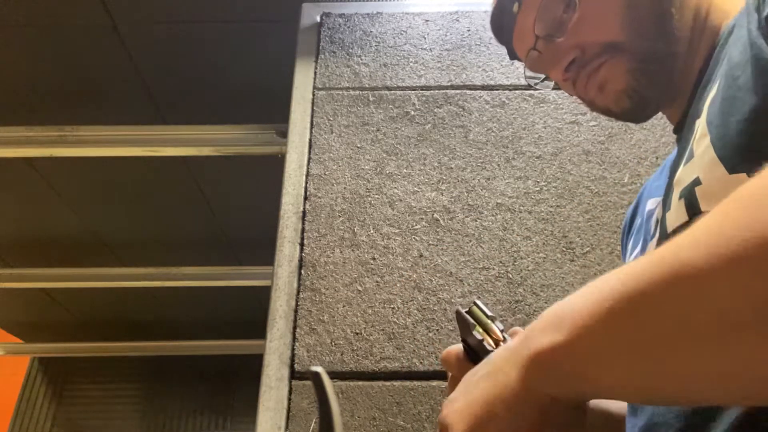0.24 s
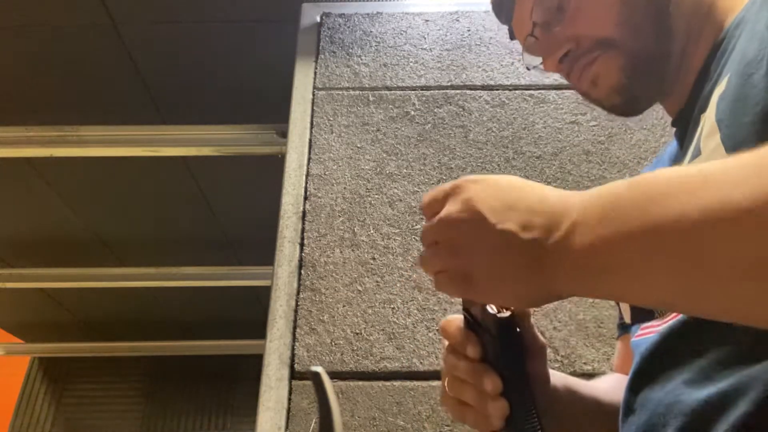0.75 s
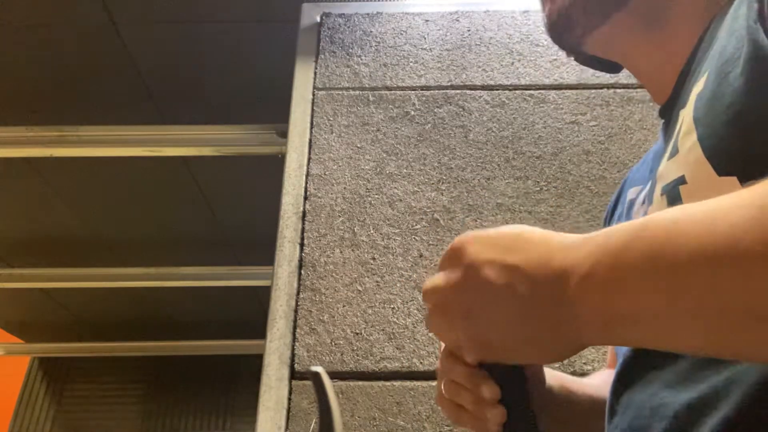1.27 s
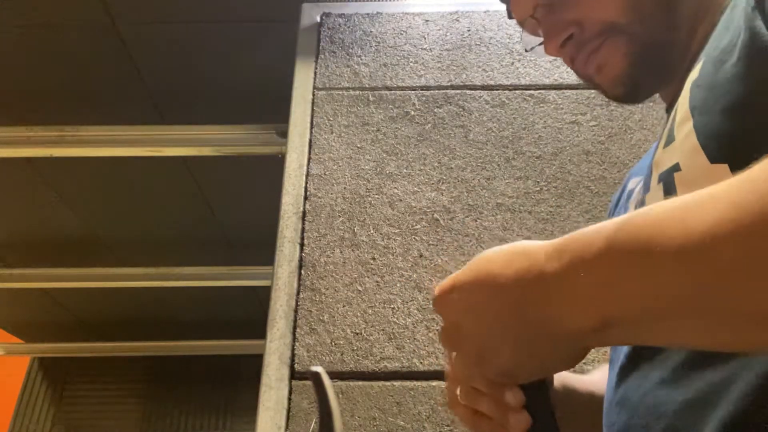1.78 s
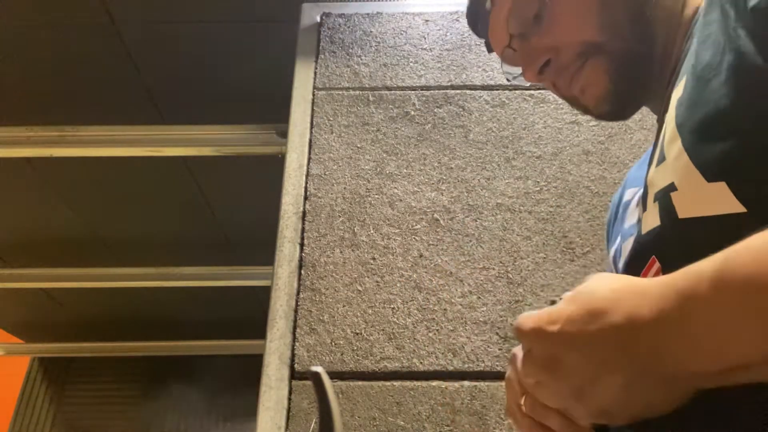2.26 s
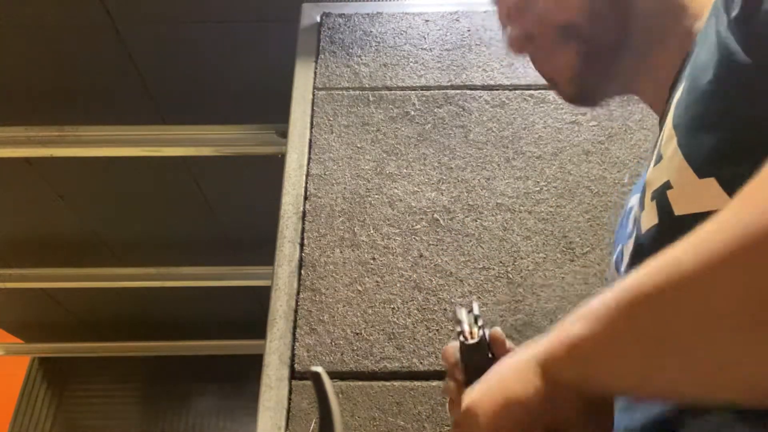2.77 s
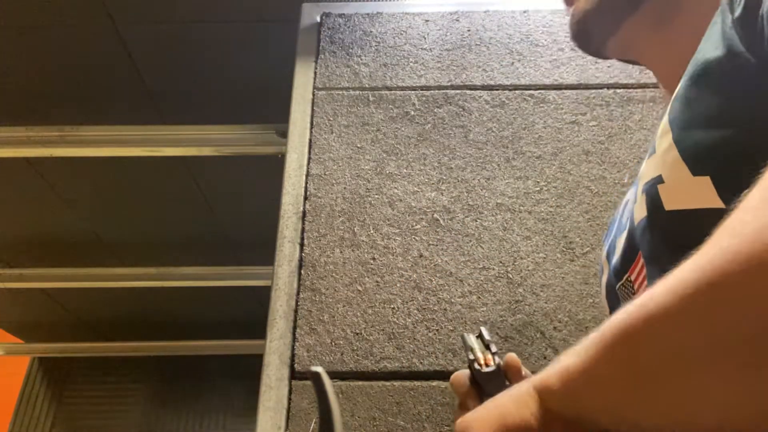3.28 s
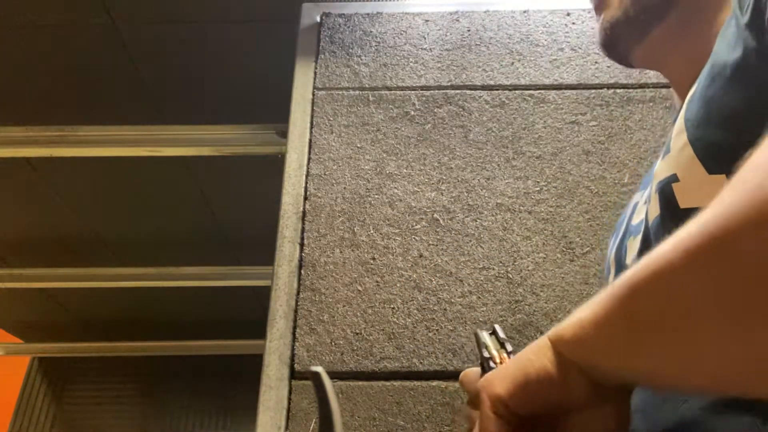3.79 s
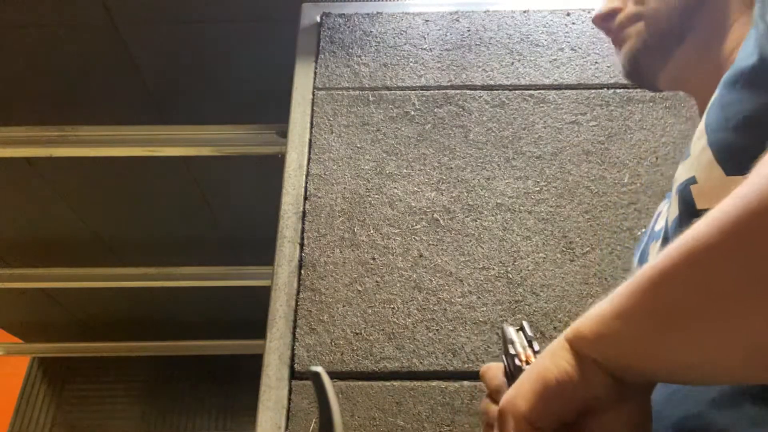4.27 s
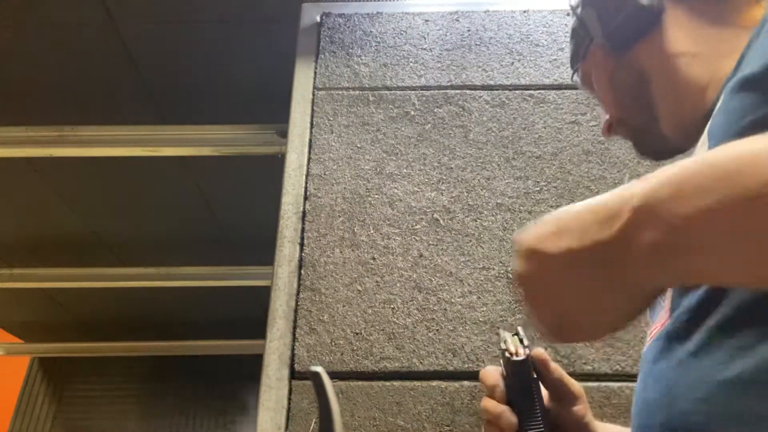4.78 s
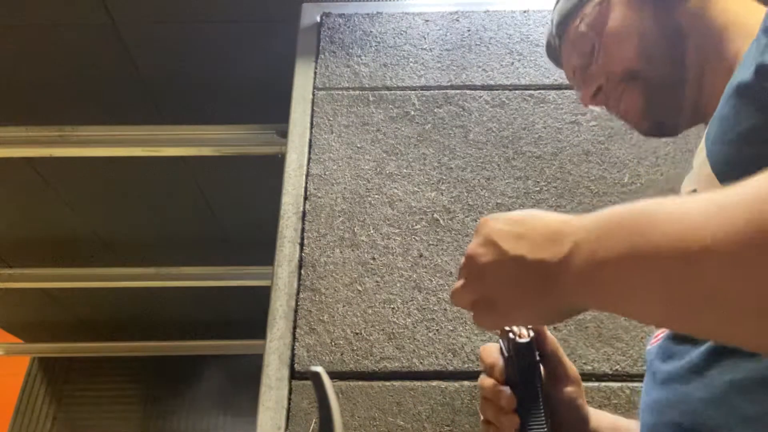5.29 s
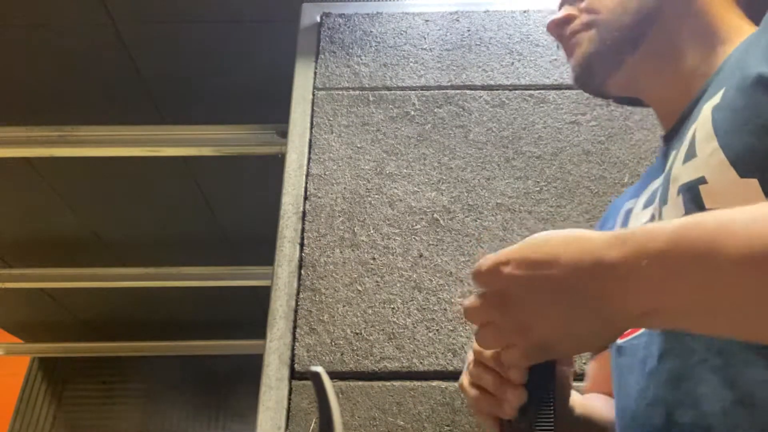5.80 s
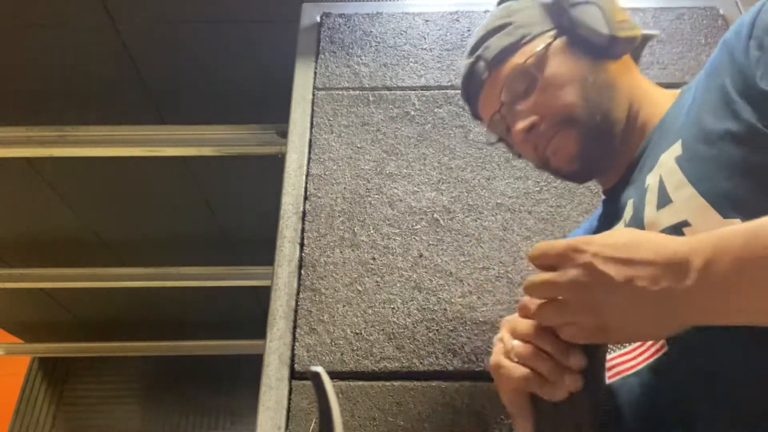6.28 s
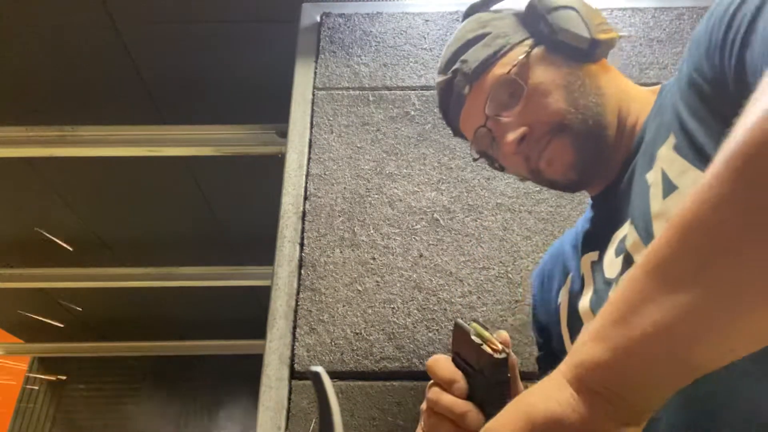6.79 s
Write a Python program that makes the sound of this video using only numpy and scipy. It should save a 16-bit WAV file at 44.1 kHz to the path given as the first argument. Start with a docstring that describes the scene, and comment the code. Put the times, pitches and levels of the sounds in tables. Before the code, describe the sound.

Handheld-style stereo pickup in a range booth: very loud blasts from other lanes, unevenly spaced, each rolling down the hall and surging back from the backstop. Near shots are sharp and fluttering; far ones dull and roaring. In the gaps come tiny close brass clinks, sliding scrapes and clicks of a magazine being loaded, above steady airy fan rumble. The last shot is cut off while still ringing.

```python
"""Indoar range: two guns fire in other lanes while someone at the microphone loads a magazine.
Near gun: a volley of shock fronts, then filtered noise as ceiling slap, close reflections and hall.
Far gun: a dull front, then a roar that swells as its reflections come round the partitions.
Each report rolls down the hall and surges back from the backstop. Cartridges are short resonant
noise touches; the ventilation is coloured noise with wavering fan tones."""
import sys
import numpy as np
from scipy import signal
from scipy.fft import rfft, irfft
from scipy.io import wavfile
from scipy.ndimage import uniform_filter1d

SR = 44100
rng = np.random.default_rng(int(sys.argv[2]) if len(sys.argv) > 2 else 0)


def generate_wav(sig):
    """Save sig (samples, or channels by samples) to the path in sys.argv[1] as 16-bit PCM at SR."""
    pcm = np.round(np.clip(np.atleast_2d(sig).T, -1, 1) * 32767).astype(np.int16)
    wavfile.write(sys.argv[1], SR, pcm)


N = 310905
RING = 2 ** 16  # samples computed per report or touch
AGE_S = np.arange(RING) / SR
HZ = np.fft.rfftfreq(RING, 1 / SR)

# Shots of each gun; a negative time is already dying away at the start: (time [s], level [dB])
NEAR_SHOTS = [(-.285, 1.5), (2.0608, -0.53), (4.3204, -0.5), (6.7556, -0.8)]
FAR_SHOTS = [(2.3555, -0.38), (5.1605, -1.63)]
# Relative spectra of first wave and close reflections: (frequency [Hz], density [dB per Hz])
NEAR_FRONT_SPECTRUM = [(50, -18), (150, -15.5), (300, -3), (520, 1), (950, 2.5), (1600, -17), (3000, -38.5),
                       (7000, -43), (12000, -38.5), (15500, -42)]
NEAR_ROAR_SPECTRUM = [(25, -16.5), (50, -12.5), (100, -11.5), (185, -15), (360, -6), (700, 1.5), (1020, -3),
                      (1600, -7.5), (2700, -18.5), (3400, -23.5), (5200, -29), (7500, -33.5), (12000, -38),
                      (15500, -43)]
FAR_FRONT_SPECTRUM = [(50, -14.5), (300, -3.5), (600, 2), (850, 1), (1500, -11), (2600, -22), (4500, -27.5),
                      (7500, -31), (12000, -36), (15500, -41)]
FAR_ROAR_SPECTRUM = [(25, -27.5), (50, -13.5), (110, -6), (175, -5), (255, 0), (360, -8.5), (560, 0),
                     (930, 2.5), (1500, -8), (2650, -17), (3400, -24), (5200, -29), (7500, -30),
                     (12000, -36.5), (15500, -41)]
# Relative spectra of ceiling slap and long hall: (frequency [Hz], density [dB per Hz])
SLAP_SPECTRUM = [(300, -18), (1500, .5), (3500, 1), (5000, -4), (7500, -4.5), (15000, -16.5)]
HALL_SPECTRUM = [(25, -17.5), (50, -6), (120, -0.5), (250, -3.5), (350, -1.5), (600, 0.5), (980, -4),
                 (1450, -14.5), (2700, -19), (3300, -27), (5200, -29.5), (7500, -35), (12000, -46.5),
                 (15500, -58)]
# Decay of close reflections and of the hall: (frequency [Hz], t60 [s])
ROAR_T60 = [(80, 0.1), (250, 0.28), (700, 0.305), (2000, 0.28), (5000, 0.31), (13000, 0.3)]
HALL_T60 = [(60, 1.55), (130, 1), (300, 1.003), (620, 0.87), (930, 1.078), (1400, 1.11), (2600, 0.97),
            (3600, 0.9), (6000, 0.82), (13000, 0.79)]
# Standing waves of the booth: (frequency [Hz], width [Hz], lift [dB])
BOOTH_MODES = [(90, 20, 3), (213, 18, 7), (287, 18, 7), (404, 18, 7), (545, 22, 4), (622, 24, 6),
               (693, 18, 5), (814, 22, 6), (933, 18, 5), (996, 22, 7), (1085, 20, 3), (1189, 22, 4),
               (1293, 36, 4), (1359, 18, 4), (2221, 22, 5), (2561, 26, 5)]
# Strong single reflections off ceiling and walls: (time after shot [s], level [dB])
NEAR_ECHOES = [(.0145, 8.5), (.0158, 7.5), (.0312, 9), (.036, 9), (.046, 6), (.069, 3)]
FAR_ECHOES = [(.022, 14.5), (.0305, 8), (.0405, 12), (.046, 11), (.063, 7.6)]
# Muzzle gas thump: (level [dB], frequency [Hz], peak [s], width [s])
NEAR_THUMP = (-12, 95.6, .019, .008)
FAR_THUMP = (-23.5, 117, .029, .012)
# Bright slap off the ceiling: (level [dB], rise [s], holds until [s], fade [s])
NEAR_SLAP = (-25.3, .016, .018, .02)
FAR_SLAP = (-32, .03, .04, .02)
# Hall, then its surge from the backstop:
# (level [dB], rise [s], surge delay [s], surge level [dB], surge rise [s], surge fade [s])
NEAR_HALL = (-21.8, .011, .23, 3.5, .011, .06)
FAR_HALL = (-20.5, .094, .1964, -1.5, .027, .055)
# Cartridge snaps past the feed lips: (time [s], level [dB], brightness [dB per octave])
SNAPS = [(0.9056, -59, 0.5), (1.0575, -65.5, -3), (2.3322, -48, 8), (2.941, -60, -2), (2.9674, -56.5, 1),
         (3.332, -64, 2), (3.901, -67, 1), (5.5315, -59, 3), (6.145, -58.5, -1), (6.1694, -47, .5)]
# Cartridges pushed along the one below, plus dull rustles of the hand at 3.5 and 3.835 s: (time [s], level
# [dB], brightness [dB per octave], t60 [s])
SLIDES = [(.8, -82, 4, .25), (2.999, -68, .5, 0.32), (3.27, -76, 3, .15), (3.5, -66, -8, .2),
          (3.835, -68, -7, .2), (6.071, -49.5, -1, 0.12), (6.669, -62, -8, 0.16)]
# Loose cases touch in the hand: (time [s], ring level [dB])
CLINKS = [(1.0575, -79), (3.471, -80), (3.653, -81), (3.822, -81), (3.876, -69), (4.1805, -78),
          (6.718, -72)]
# Relative spectrum of the magazine rattle: (frequency [Hz], density [dB per Hz])
MAGAZINE_SPECTRUM = [(600, -9), (1200, 6), (1900, -2.5), (3200, -12), (4800, -8.5), (6800, -15),
                     (8500, -14), (10300, -14.5), (12200, -17.5), (15500, -23)]
# Resonances of the magazine body: (frequency [Hz], width [Hz], lift [dB])
MAGAZINE_MODES = [(1290, 80, 3), (2660, 120, 3), (3670, 120, 4), (4700, 150, 2), (5600, 300, 5)]
# Relative spectrum of moving air: (frequency [Hz], density [dB per Hz])
AIR_SPECTRUM = [(20, -26), (35, -12.5), (55, 4.5), (90, -3.5), (150, -3.5), (230, -9.5), (330, -12.5),
                (900, -15), (1500, -24), (2800, -32), (4500, -39.5), (7000, -48.5), (11000, -53),
                (15500, -57.5)]
# Fan tones: (frequency [Hz], level before the common trim [dB])
FAN_TONES = [(59.2, -69), (134.6, -70), (231.5, -75), (3580, -88.5)]
# Path from each source to the two microphone ports:
# (frequency [Hz], likeness [0-1], phase lead of left [rad], left minus right [dB])
FROM_LANES = [(60, .8, .05, 1.3), (220, .8, .15, -.6), (400, .65, .6, 3.0), (750, .45, 2.0, 2.8),
              (1200, .4, 2.9, -1.8), (1900, .45, 4.0, -1.7), (2700, .35, 6.7, -1.5), (4800, .25, 6.3, -.8)]
FROM_HALL = [(60, .93, -0.5, -1.3), (229.7, .8, 0.0, -0.84), (464, 0.48, 1, 2.5), (836, 0.057, 3, 4),
             (1229.5, 0.61, 4, -2.5), (2350, 0.2, 4.5, -3), (4846, 0.19, 7, -2.5)]
FROM_HANDS = [(94, 0.54, 0.0, -9), (1100, 0.3, -0.74, -4), (2545, 0.69, -.4, -2.5), (4800, 0.43, 0.68, 1.5)]
FROM_VENTS = [(60, .85, 0.0, -.5), (230, .75, -.1, -.8), (420, .45, -1.2, 1.0), (900, .45, -2.4, -2.0),
              (1900, .55, -3.1, -7.0), (3300, .4, -6.0, -4.5), (4800, .25, -6.3, -2.0)]
# Shared path from any direction at the top, where the ports are much alike:
# (frequency [Hz], likeness [0-1], phase lead of left [rad], left minus right [dB])
TOP_OCTAVE = [(6300, .7, .3, 0), (7500, .8, 0, 0), (8900, .85, -1.4, 0), (9750, 1, -np.pi, 0),
              (10750, 1, -np.pi, 0), (11700, .95, -6.1, 0), (13600, .98, -6.3, 0), (15400, .9, -9.2, 0)]

LANE_CHANGE = .5  # new reflections per shot, relative to the lane's fixed pattern
BOUNCE_FIRST_S, BOUNCE_FIRST_GAP_S = .0007, .0023
BOUNCE_CROWDING = .8  # each gap relative to the one before
BOUNCE_DB, BOUNCE_ARCH_DB = 12, 3.6
NEAR_WALL_DB, NEAR_WALL_RISE_S = -15.5, .0014
FAR_WALL_DB, FAR_WALL_START_S, FAR_WALL_RISE_S = -5.5, .016, .028
FAR_FRONT_DB, FAR_FRONT_RISE_S, FAR_FRONT_HOLD_S, FAR_FRONT_FADE_S = -18, .0031, .02, .0027
FAR_ROAR_DB, FAR_ROAR_START_S, FAR_ROAR_RISE_S = .3, .008, .04
PORT_LAG_S, THUMP_LAG_S = .00034, .001  # right port after left: wave fronts, slow push
PORT_LEAN_DB = 1.8  # left minus right, wave fronts
SNAP_RISE_S, SNAP_T60_S = .0018, .052
SNAP_RING_DB, SLIDE_RING_DB = -18.5, -30  # brass ring relative to body
SLIDE_RISE = .07  # pressure build-up relative to t60
CLINK_RISE_S, CLINK_T60_S = .002, .079
CLINK_TICK_DB = 0  # body tick relative to ring
BRASS_HZ, BRASS_WIDTH_HZ = 11900, 260
AIR_DB, FAN_TRIM_DB = -61, -3
RUMBLE_CUT_HZ, EDGE_HZ = 30, 15700


def gun(shots, report):
    """A gun stays in its lane, so its shots share a reflection pattern that changes only in part."""
    out = np.zeros((2, N))
    lane = scatter()
    fade = 1 - swell(1.2, .25)
    for time_s, db in shots:
        spray = (lane + LANE_CHANGE * scatter()) / np.hypot(1, LANE_CHANGE)
        add(out, time_s, amp(db) * fade * report(spray))
    return out


def near_report(spray):
    """Shock fronts, bright ceiling slap, roar of close reflections, hall and gas thump."""
    close = ports(spray, FROM_LANES)
    near_wall = amp(NEAR_WALL_DB) * swell(0, NEAR_WALL_RISE_S)
    far_wall = amp(FAR_WALL_DB) * swell(FAR_WALL_START_S, FAR_WALL_RISE_S)
    wash = absorb(close, ROAR_T60) * (near_wall + far_wall)
    roar_db = read(NEAR_ROAR_SPECTRUM, HZ) + lift_db(BOOTH_MODES)
    roar = colour(wash + arrivals(NEAR_ECHOES), roar_db)
    return flutter() + slap(close, *NEAR_SLAP) + roar + hall(spray, *NEAR_HALL) + thump(*NEAR_THUMP)


def far_report(spray):
    """A weak, dull front bends round the partitions; the main roar follows off ceiling and walls."""
    close = ports(spray, FROM_LANES)
    pulse = close * burst(FAR_FRONT_RISE_S, FAR_FRONT_HOLD_S, FAR_FRONT_FADE_S)
    front = amp(FAR_FRONT_DB) * colour(pulse, read(FAR_FRONT_SPECTRUM, HZ))
    build_up = amp(FAR_ROAR_DB) * swell(FAR_ROAR_START_S, FAR_ROAR_RISE_S)
    wash = absorb(close, ROAR_T60) * build_up
    roar_db = read(FAR_ROAR_SPECTRUM, HZ) + lift_db(BOOTH_MODES)
    roar = colour(wash + arrivals(FAR_ECHOES), roar_db)
    return front + slap(close, *FAR_SLAP) + roar + hall(spray, *FAR_HALL) + thump(*FAR_THUMP)


def flutter(count=4):
    """The shock front bounces between booth partitions at shrinking gaps, levels in one arch."""
    k = np.arange(count)
    gaps_s = BOUNCE_FIRST_GAP_S * BOUNCE_CROWDING ** k
    times_s = BOUNCE_FIRST_S + np.cumsum(gaps_s) - gaps_s
    levels_db = BOUNCE_DB + BOUNCE_ARCH_DB * np.sin(np.pi * (k + .5) / count)
    return colour(arrivals(zip(times_s, levels_db)), read(NEAR_FRONT_SPECTRUM, HZ))


def thump(db, hz, peak_s, width_s):
    """Expanding muzzle gas pushes a few slow cycles through the booth: a cosine in a Gaussian."""
    t = AGE_S - peak_s + THUMP_LAG_S * np.array([[.5], [-.5]])
    return amp(db) * np.cos(2 * np.pi * hz * t) * np.exp(-(t / width_s) ** 2) * swell(0, .006)


def slap(close, db, rise_s, hold_s, fade_s):
    """The hard ceiling throws the treble of the blast down into the booth."""
    return amp(db) * colour(close * burst(rise_s, hold_s, fade_s), read(SLAP_SPECTRUM, HZ))


def hall(spray, db, rise_s, surge_s, surge_db, surge_rise_s, surge_fade_s):
    """Long reverberation, surging again when the blast returns from the backstop."""
    surge_fade = np.exp(-np.maximum(AGE_S - surge_s, 0) / surge_fade_s)
    surge = amp(surge_db) * swell(surge_s, surge_rise_s) * surge_fade
    tail = absorb(ports(spray, FROM_HALL), HALL_T60) * swell(0, rise_s) * (1 + surge)
    return amp(db) * colour(tail, read(HALL_SPECTRUM, HZ) + .5 * lift_db(BOOTH_MODES))


def magazine():
    """Cartridges clink in the hand, slide into the magazine and snap past the feed lips."""
    out = np.zeros((2, N))
    for time_s, db, bright_db in SNAPS:
        add(out, time_s, touch(db, db + SNAP_RING_DB, bright_db, SNAP_RISE_S, SNAP_T60_S))
    for time_s, db, bright_db, t60_s in SLIDES:
        add(out, time_s, touch(db, db + SLIDE_RING_DB, bright_db, SLIDE_RISE * t60_s, t60_s))
    for time_s, db in CLINKS:
        add(out, time_s, touch(db + CLINK_TICK_DB, db, 0, CLINK_RISE_S, CLINK_T60_S))
    return out


def touch(body_db, ring_db, bright_db, rise_s, t60_s):
    """One cartridge contact: noise pressure rattles the magazine body and rings the brass."""
    brass_db = -20 * np.log10(1 + ((HZ - BRASS_HZ) / BRASS_WIDTH_HZ) ** 2)
    octaves = np.log2(np.maximum(HZ, MAGAZINE_SPECTRUM[0][0]) / BRASS_HZ)
    pressure = swell(0, rise_s) * amp(-60 * np.maximum(AGE_S - rise_s, 0) / t60_s)
    contact = ports(rng.standard_normal((2, RING)), FROM_HANDS) * pressure
    body_curve_db = read(MAGAZINE_SPECTRUM, HZ) + lift_db(MAGAZINE_MODES) + bright_db * octaves
    return amp(body_db) * colour(contact, body_curve_db) + amp(ring_db) * colour(contact, brass_db)


def ventilation(waver=.97, flicker=.7):
    """Rumble of moving air, plus fan tones with random-walk phase and slowly varying strength."""
    hz, t = np.fft.rfftfreq(N, 1 / SR), np.arange(N) / SR
    air = unit(irfft(rfft(rng.standard_normal((2, N))) * amp(read(AIR_SPECTRUM, hz)), N))
    drift = np.cumsum(rng.standard_normal((len(FAN_TONES), N)), axis=1) / np.sqrt(SR)
    slow_noise = irfft(rfft(rng.standard_normal((len(FAN_TONES), N))) * np.exp(-(hz / 3) ** 2), N)
    strength = 1 + flicker * unit(slow_noise)
    tones = np.zeros(N)
    for (tone_hz, db), walk, gain in zip(FAN_TONES, drift, strength):
        tones += amp(db) * gain * np.sin(2 * np.pi * (tone_hz * t + waver * walk))
    return amp(AIR_DB) * ports(air, FROM_VENTS) + amp(FAN_TRIM_DB) * tones


def scatter(clump_db=.5):
    """Two sprays of dense reflections, evened out over time and band, arriving in clumps."""
    x = rng.standard_normal((2, RING))
    for size in (2 ** 10, 2 ** 12):
        z = signal.stft(x, nperseg=size)[2]
        x = signal.istft(z / np.sqrt(abs(z) + 1e-12), nperseg=size)[1]
    clumps = unit(uniform_filter1d(rng.standard_normal(RING), size=220))
    return unit(x * amp(clump_db * clumps))


def arrivals(rows):
    """Single wave fronts, each a moment later and a little quieter at the right port."""
    pair = 0
    for time_s, db in rows:
        port_times_s = np.array([[time_s], [time_s + PORT_LAG_S]])
        pair = pair + amp(db) * np.exp(-2j * np.pi * HZ * port_times_s)
    return irfft(pair) * amp([[PORT_LEAN_DB / 2], [-PORT_LEAN_DB / 2]])


def absorb(x, t60s):
    """Every band dies at its own speed."""
    hz, t, z = signal.stft(x, SR, nperseg=2 ** 8)
    return signal.istft(z * amp(-60 * t / read(t60s, hz)[:, None]), SR, nperseg=2 ** 8)[1]


def ports(pair, direction):
    """Two unrelated signals become what the two ports hear: partly alike, shifted in phase."""
    a, b = rfft(pair)
    hz = np.fft.rfftfreq(pair.shape[1], 1 / SR)
    below_top = hz < TOP_OCTAVE[0][0]
    same, lead_rad, lean_db = (np.where(below_top, read(direction, hz, k), read(TOP_OCTAVE, hz, k))
                               for k in range(1, 4))
    same = np.clip(same, 0, 1)
    right = (same * a + np.sqrt(1 - same ** 2) * b) * np.exp(-1j * lead_rad)
    return irfft(np.array([a * amp(lean_db / 2), right * amp(-lean_db / 2)]), pair.shape[1])


def colour(x, db):
    """Causal minimum-phase filter of unit power with the given gain curve."""
    log_gain = np.log(np.maximum(unit(amp(db)), 1e-4))
    circle = np.r_[log_gain, log_gain[-2:0:-1]]
    return irfft(rfft(x) * np.exp(np.conj(signal.hilbert(circle)))[:len(HZ)])


def lift_db(resonances):
    """Resonances lift narrow bands of a spectrum."""
    return sum(db / (1 + (2 * (HZ - hz) / width_hz) ** 2) for hz, width_hz, db in resonances)


def burst(rise_s, hold_s, fade_s):
    """Envelope that rises, holds until a given age and fades exponentially."""
    return swell(0, rise_s) * np.exp(-np.maximum(AGE_S - hold_s, 0) / fade_s)


def swell(start_s, rise_s):
    """Smooth step from 0 to 1."""
    return np.sin(np.pi / 2 * np.clip((AGE_S - start_s) / rise_s, 0, 1)) ** 2


def read(table, hz, axis=1):
    """One table column, interpolated along log frequency."""
    columns = np.transpose(table)
    return np.interp(np.log(hz + 1), np.log(columns[0] + 1), columns[axis])


def amp(db):
    """Decibels to gain."""
    return 10 ** (np.asarray(db) / 20)


def unit(x):
    """Scales to rms 1."""
    return x / np.sqrt(np.mean(abs(x) ** 2) + 1e-20)


def add(mix, time_s, sound):
    """Mixes a sound in at a time that may lie before the start."""
    at = round(time_s * SR)
    part, sound = mix[:, max(at, 0):], sound[:, max(-at, 0):]
    part[:, :sound.shape[1]] += sound[:, :part.shape[1]]


def scene():
    """Both guns, the magazine and the air."""
    guns = gun(NEAR_SHOTS, near_report) + gun(FAR_SHOTS, far_report)
    return guns + magazine() + ventilation()


def record(dry, ceiling=.97):
    """The microphone sheds deep rumble, rounds off the loudest peaks and limits the band."""
    high_pass = signal.butter(2, RUMBLE_CUT_HZ, "highpass", fs=SR, output="sos")
    lean = signal.sosfilt(high_pass, dry)
    rounded = lean / (1 + (lean / ceiling) ** 6) ** (1 / 6)
    low_pass = signal.firwin(511, EDGE_HZ, window=("kaiser", 9), fs=SR)
    return signal.oaconvolve(rounded, low_pass[None], "same")


dry = scene()
out = record(dry)
generate_wav(out)
```